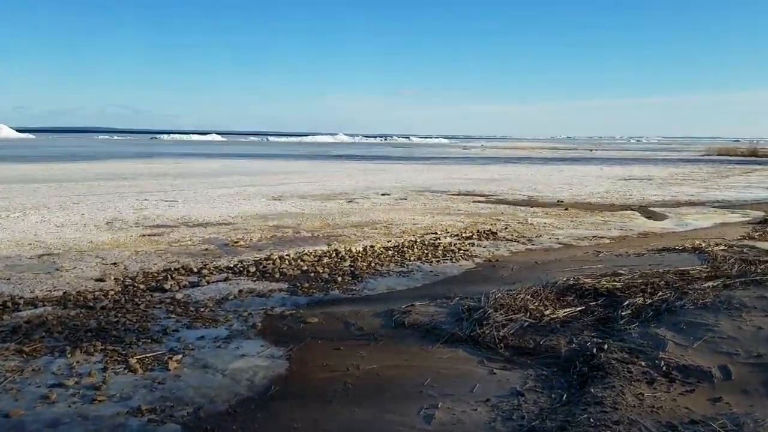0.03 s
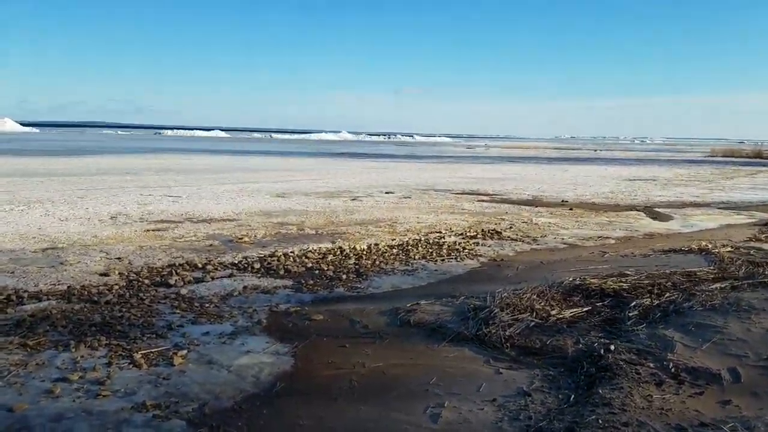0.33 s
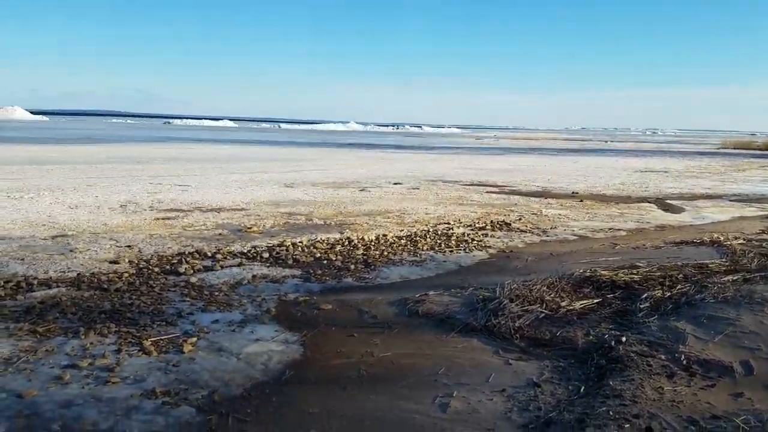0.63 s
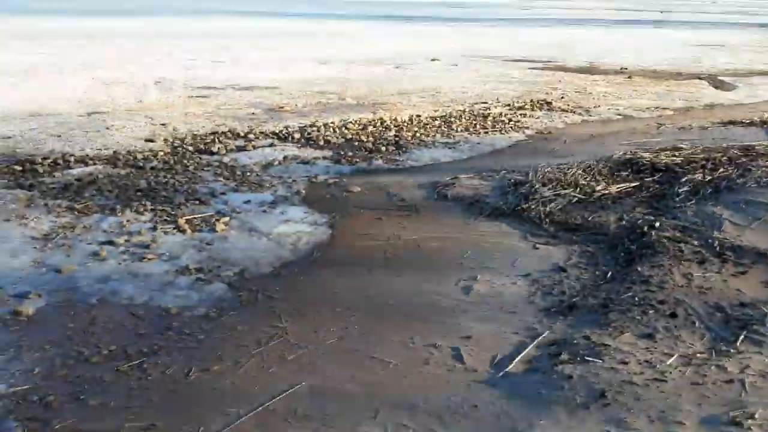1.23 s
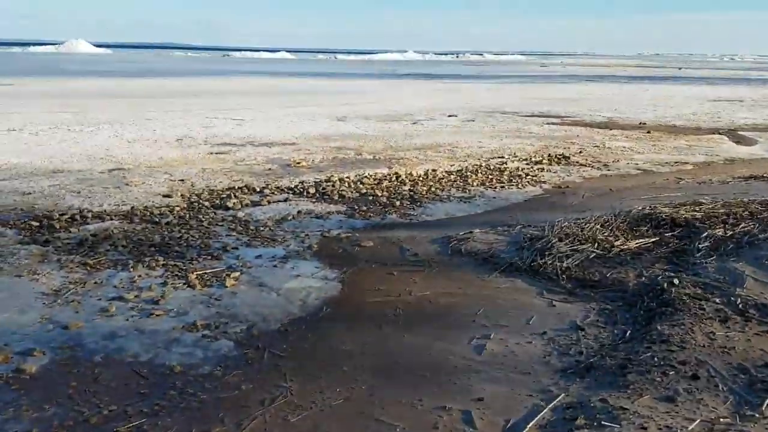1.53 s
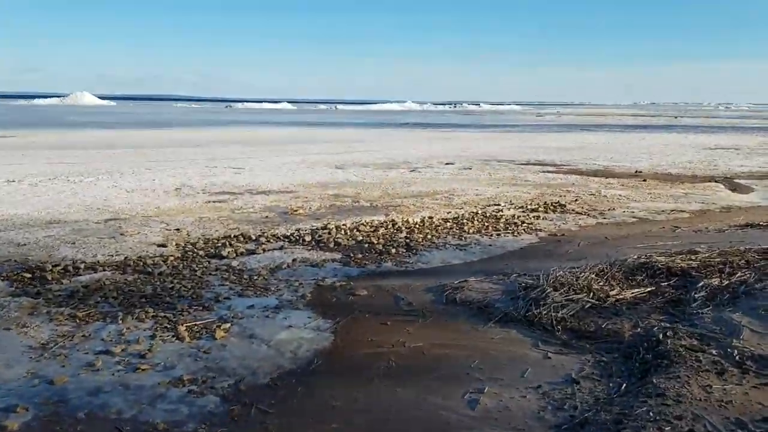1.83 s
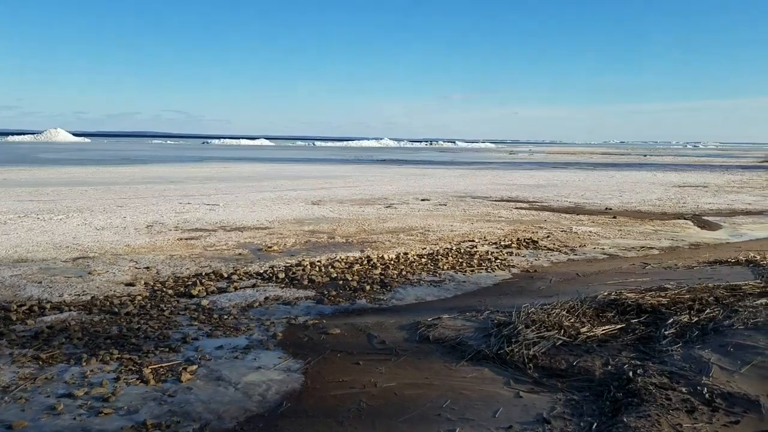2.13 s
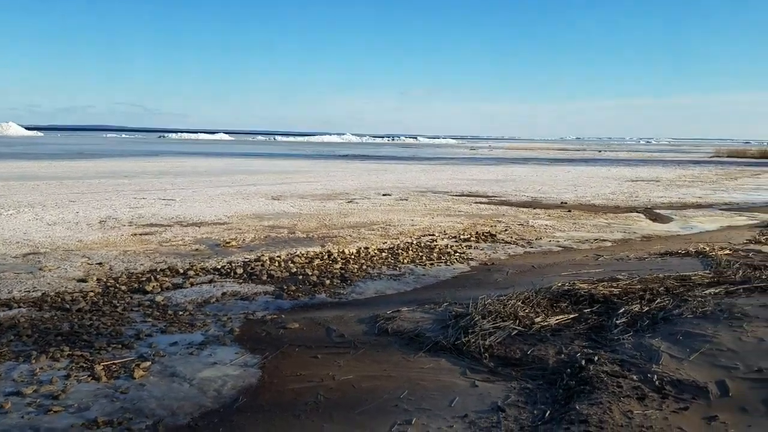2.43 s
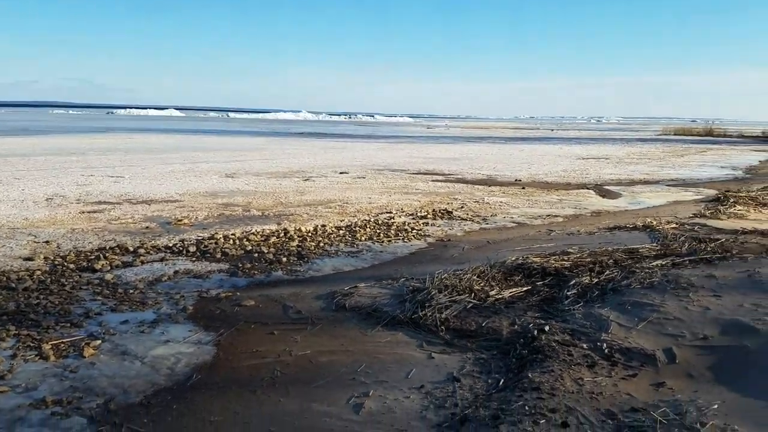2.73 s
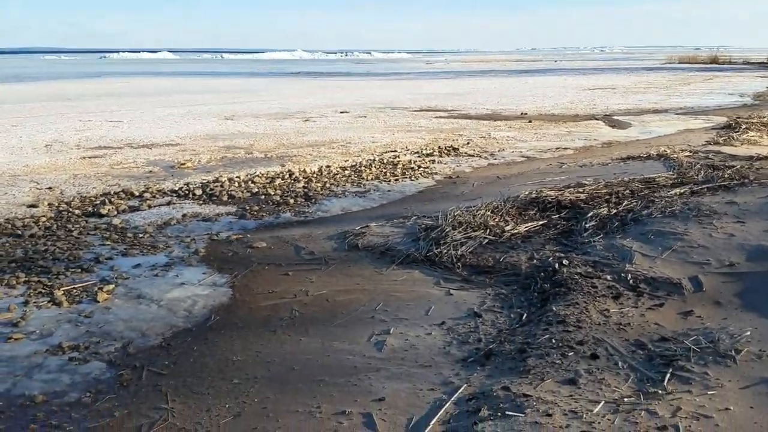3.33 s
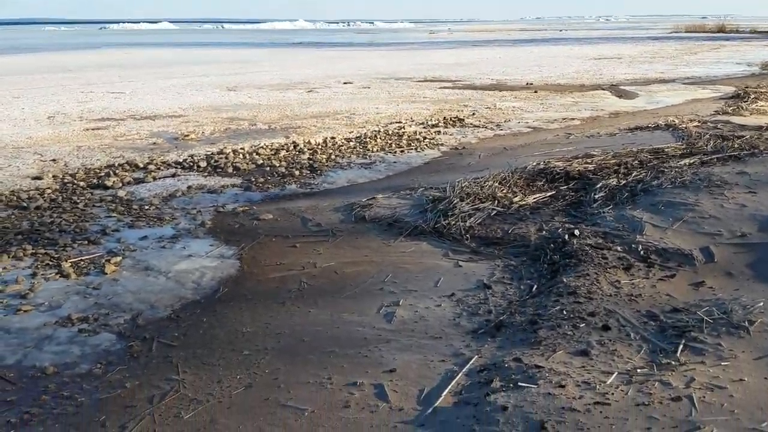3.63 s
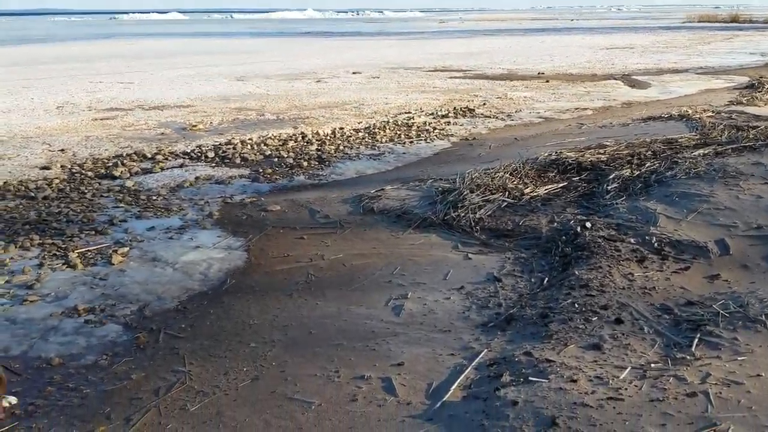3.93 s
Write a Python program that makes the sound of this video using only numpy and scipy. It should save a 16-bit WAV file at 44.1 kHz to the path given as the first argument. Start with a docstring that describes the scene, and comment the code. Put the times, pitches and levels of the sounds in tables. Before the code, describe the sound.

Wind rumbles and thumps on a hand-held microphone on a frozen shore. After a brief lull, icy crust crunches, snaps and knocks close on the left, as if underfoot, while the gusts return over a faint hiss.

```python
"""Wind on a frozen shore buffets the two microphone ports (openings) of a hand-held camera.
Its swirls rumble and thump, and the hardest gusts flutter in the right port.
Icy crust breaks close by on the left, as if underfoot, mostly after a lull in the wind:
crushed grains crunch, thin shards snap and thick plates knock.
Faint ticks of ice and a soft hiss of open air go on behind it all."""
import sys
import numpy as np
from scipy import signal
from scipy.fft import rfft, irfft, next_fast_len
from scipy.io import wavfile
from scipy.ndimage import uniform_filter1d, map_coordinates

SR = 44100
rng = np.random.default_rng(int(sys.argv[2]) if len(sys.argv) > 2 else 0)


def transcribe(u):
    """Save the signal u as a 16-bit wav file named by the first command-line argument.

    u: samples, shape (n,) or (channels, n), limited to [-1, 1]; the rate is SR.
    q: integer samples, one column per channel.
    """
    v = np.clip(np.atleast_2d(u).T, -1, 1)
    q = np.round(v * 32767).astype(np.int16)
    wavfile.write(sys.argv[1], SR, q)


N = 176400
TOP_HZ = 16000  # nothing higher gets through


# Tone of the wind's rumble: f/Hz, level/dB
RUMBLE_TONE = [(20, -38), (40, -22), (65, -2.5), (110, 1.5), (200, -1), (420, -6), (540, -13.5), (720, -19),
               (1000, -28.5), (1600, -33.5), (4000, -80)]
# Wind strength at the left and at the right port: t/s, level/dB
WIND_LEFT = [(0, -39.5), (.1, -36.5), (.26, -45), (.4, -58), (.59, -39), (.78, -48), (.81, -44.5),
             (.99, -45), (1.03, -38), (1.1, -48.5), (1.155, -48), (1.19, -49.5), (1.34, -43.5),
             (1.43, -54.5), (1.64, -50.5), (1.69, -59), (1.73, -50), (2.11, -51.5), (2.19, -58),
             (2.27, -50), (2.45, -49), (2.48, -41.5), (2.75, -49), (2.83, -41.5), (2.94, -62), (3.01, -32),
             (3.07, -49.5), (3.11, -35.5), (3.19, -37.5), (3.23, -51), (3.33, -38.5), (3.43, -55),
             (3.505, -24), (3.54, -32.5), (3.65, -38), (3.695, -32), (3.84, -51), (3.87, -39.5),
             (3.95, -40.5), (4, -72)]
WIND_RIGHT = [(0, -35.5), (.05, -33), (.14, -31), (.17, -35.5), (.245, -39), (.275, -30), (.32, -37.5),
              (.4, -42), (.44, -37.5), (.52, -38), (.545, -41), (.585, -32.5), (.67, -35), (.695, -42),
              (.75, -28.5), (.785, -32), (.81, -36.5), (.835, -41), (.86, -31.5), (.95, -37), (1.06, -46),
              (1.1, -49), (1.15, -37), (1.22, -52), (1.255, -39), (1.3, -47), (1.46, -51.5), (1.57, -44),
              (1.68, -46), (1.8, -50), (1.85, -41.5), (1.9, -46), (2.02, -43.5), (2.16, -48), (2.32, -34),
              (2.4, -38.5), (2.44, -43.5), (2.49, -37), (2.75, -41.5), (2.8, -54), (2.84, -32),
              (2.89, -44.5), (3.03, -35), (3.07, -45.5), (3.11, -35.5), (3.2, -38.5), (3.29, -59),
              (3.34, -36.5), (3.39, -65), (3.5, -30.5), (3.61, -49.5), (3.67, -38.5), (3.72, -46.5),
              (3.91, -45), (4, -68)]

def wind_rumble(swirls_per_s=70, puffs_per_s=110, depth_db=4, split_hz=216):
    """Each port meets its own swirls of air; stronger wind sounds brighter."""
    wind_db = np.array([over_time(WIND_LEFT), over_time(WIND_RIGHT)])
    swirls = amp(depth_db * np.array([wobble(swirls_per_s), wobble(swirls_per_s)]))
    flow = swirls * noise(RUMBLE_TONE)
    power = uniform_filter1d(uniform_filter1d(flow ** 2, size=2000), size=800)
    flow = flow / np.sqrt(np.abs(power) + 1e-12)  # even out slow swells, keep quick ones
    low = filtered(flow, lambda hz: 1 / (1 + (hz / split_hz) ** 4))
    high = flow - low
    puffs = unit(amp(depth_db * np.array([wobble(puffs_per_s), wobble(puffs_per_s)])))
    brightness = amp(0.29 * (wind_db - wind_db.mean()))
    return amp(wind_db) * (low + high * puffs * brightness)


# Hard gusts: start t/s, length/s, level/dB, top edge f/Hz
GUSTS = [(.005, 0.12, -47, 1760), (0.247, 0.061, -46, 1580), (0.321, 0.13, -46.5, 1300),
         (0.5, 0.032, -42.5, 1950), (0.591, 0.054, -42, 2050), (0.648, 0.034, -44.5, 1700),
         (0.719, 0.026, -45, 1370), (0.742, 0.051, -40.5, 2600), (0.794, 0.02, -49.5, 2000),
         (0.862, 0.03, -41, 2260), (0.894, 0.036, -44, 1940), (2.276, .095, -43, 1560),
         (2.372, 0.11, -44.5, 1830)]

def wind_flutter(low_hz=860, fade_s=0.0116, pitch_sag=0.3):
    """Hard gusts break into a rasp at the right port; its pitch rises and falls with each gust."""
    t, right = clock(), np.zeros(N)
    rough = unit(rng.standard_normal(N) * amp(4 * wobble(260)))
    for start, length, db, top_hz in GUSTS:
        def band(hz):
            low_cut = hz ** 2 / (hz ** 2 + low_hz ** 2)
            return low_cut / np.sqrt(1 + (hz / top_hz) ** 11.1)
        fade = np.clip(np.minimum(t - start, start + length - t) / fade_s + .5, 0, 1)
        live = np.flatnonzero(fade)
        rasp = unit(filtered(rough[live], band))
        speed = 1 - pitch_sag * np.linspace(-1, 1, len(live)) ** 2  # slower, so lower, at both ends
        bent = map_coordinates(rasp, [np.cumsum(speed)], mode="mirror")
        add(right, amp(db) * fade[live] * bent, live[0])
    return np.array([np.zeros(N), right])


# Single swirls hitting the ports: t/s, level/dB, f/Hz, left minus right/dB
THUMPS = [(.043, -17.5, 250, -13), (.588, -23, 325, -13), (.857, -29, 207, -1), (1.147, -28, 228, -8),
          (1.254, -30.5, 161, -5), (1.674, -37.5, 640, -18), (2.999, -30.5, 264, -6), (3.085, -25, 356, 9),
          (3.137, -23.5, 275, 4), (3.331, -28, 151, -1), (3.472, -23, 650, 2), (3.483, -20, 520, 5),
          (3.505, -16, 237, 26), (3.516, -16.5, 273, 10), (3.585, -22, 296, 24), (3.691, -25, 227, 0)]

def wind_thumps(width_cycles=0.61):
    """One swirl of air pushes on a port for a cycle or two."""
    out = np.zeros((2, N))
    for when, db, hz, pan_db in THUMPS:
        cycles = (clock() - when) * hz
        push = np.exp(-(cycles / width_cycles) ** 2) * np.sin(2 * np.pi * (cycles + rng.random()))
        side_db = np.minimum([[pan_db], [-pan_db]], 0)  # turn down the weaker side
        out += amp(db + side_db) * push
    return out


# Crust being crushed: peak t/s, rise/s, fall/s, level before trim/dB, body/dB, treble/dB
CRUNCHES = [(0.214, .05, 0.056, -43.5, 8.5, -11.5), (.465, 0.043, 0.063, -45.5, 7, -14),
            (.61, 0.16, .13, -56, -14, 5), (1.0, 0.091, 0.056, -51.5, 7, -8),
            (1.078, .01, .14, -54.5, -2, 5), (1.105, 0.022, 0.049, -41, -0.5, -12.5),
            (2.38, .03, 0.057, -47.5, -10, -14), (2.5, 0.025, 0.078, -47, -13, -4),
            (2.55, 0.059, 0.055, -44, -16, -8), (2.686, 0.054, 0.14, -40.5, 2.5, -3),
            (2.905, 0.063, 0.031, -42.5, -2, 5), (2.999, 0.089, 0.12, -49, 11, 3.5),
            (3.12, 0.15, .14, -57.5, -21, 4), (3.285, 0.1, 0.035, -44, -33, 0),
            (3.42, 0.036, .04, -47.5, -6, -2.5), (3.468, 0.013, 0.032, -29, -1.5, -12),
            (3.488, 0.038, .03, -29, 9, -8.5), (3.53, 0.056, 0.042, -42.5, -18, 9.5),
            (3.651, 0.04, 0.11, -44, 2, 1.5), (3.755, 0.053, 0.037, -47, -14, -3),
            (3.795, 0.032, 0.1, -46.5, -26, -1), (3.865, 0.034, .06, -43.5, -24, -4),
            (3.908, 0.025, 0.027, -37, -7, -5), (3.97, 0.029, 0.038, -41, 4.5, 7.5)]

def ice_crunches(grains_per_s=2200, spread_db=5.5, powder=0.72, trim_db=-2.5):
    """Crust crumbles into uneven grains and powder, swelling and then fading by 20 dB per rise or fall."""
    t, out = clock(), np.zeros(N)
    sizes = amp(spread_db * np.minimum(rng.exponential(size=N), 4)) * rng.choice([-1, 1], N)
    clicks = unit(sizes * (rng.random(N) < grains_per_s / SR))
    grains = unit(clicks + powder * rng.standard_normal(N))
    for peak, rise, fall, db, body_db, treble_db in CRUNCHES:
        from_peak = np.maximum((peak - t) / rise, (t - peak) / fall)
        live = np.flatnonzero(from_peak < 2)
        burst = grains[live] * amp(db + trim_db - 20 * from_peak[live])
        add(out, crust_tone(burst, body_db, treble_db, ring_hz=2830, ring_db=-2.5), live[0])
    return out


# Thin shards breaking: t/s, length/s, level before trim/dB, body/dB, treble/dB
SNAPS = [(0.182, .003, -42, 10, -2), (0.509, 0.0016, -45.5, 2, 8), (0.685, 0.0024, -51, -13, 14),
         (1.071, 0.0069, -50, -13, 36), (1.145, 0.0025, -53, -6, 0), (1.234, .002, -49, 0, 11),
         (1.844, .002, -55, 2, 14), (2.0, 0.0023, -44.5, -2, -7), (2.37, .002, -41.5, -1, 4),
         (2.477, 0.0028, -33, 3, -4), (2.482, 0.0026, -33.5, -3, -14), (2.493, 0.0018, -30, -9, 9),
         (2.503, 0.0025, -32.5, -19, 4), (2.524, 0.0022, -36, -9, 11), (2.529, .003, -36, -6, 7),
         (2.568, 0.0045, -38.5, -15, 11), (2.583, 0.0053, -39.5, -1, 0), (2.616, 0.0018, -32, -29, 8.5),
         (2.622, 0.0015, -37, -10, 4), (2.679, .004, -38, 8, -20), (2.691, 0.0021, -28.5, -2, -2),
         (2.699, 0.0029, -31, -8, 24), (2.717, 0.0054, -38, 2, 3), (2.734, 0.0016, -36, -4, 22),
         (2.756, 0.0065, -42.5, 13, 9.5), (2.772, .003, -41.5, -1, -27), (2.814, 0.0033, -49.5, 14, 18),
         (2.87, 0.0017, -43, -2, 12), (2.89, .007, -43, -20, 8), (2.911, 0.018, -38.5, 1.5, 6),
         (3.019, 0.0023, -41, 16, 17), (3.11, 0.006, -44, -14, 7), (3.194, 0.0052, -34.5, -20, 6.5),
         (3.251, 0.0021, -27, -15, 3), (3.261, 0.002, -38, -23, 6), (3.277, 0.0034, -33, -19, 8),
         (3.286, 0.0059, -30, -1.5, 4), (3.301, 0.0022, -33.5, -28, 5), (3.343, 0.0044, -30.5, -22, -3.5),
         (3.534, .003, -41, -13, 12), (3.547, 0.0033, -40, -8, 11), (3.644, 0.002, -35.5, -11, 13),
         (3.737, 0.0038, -37, 7, 4), (3.747, 0.0063, -35, 8, -8), (3.759, .003, -47, -4, 12),
         (3.773, 0.0054, -30.5, 0, 0), (3.783, 0.0026, -36, -4, 5), (3.796, 0.0051, -36.5, -8, 6),
         (3.834, .008, -42, -21, -1), (3.861, 0.0023, -32, -21, 6), (3.888, 0.0017, -31.5, -23.5, 6),
         (3.902, 0.016, -34, 6, -3), (3.92, 0.0025, -29.5, -29, -2)]

def ice_snaps(trim_db=-2):
    """Thin shards snap brightly."""
    out = np.zeros(N)
    for when, length, db, body_db, treble_db in SNAPS:
        burst = shard(length, body_db, treble_db)
        add(out, amp(db + trim_db) * burst, round(when * SR) - len(burst) // 2)
    return out


# Thick plates breaking: t/s, length/s, level before trim/dB, ring f/Hz, body/dB, treble/dB
CRACKS = [(.455, 0.0055, -33.5, 2030, 8.5, -3.5), (0.467, 0.0056, -36, 2060, 7, 1),
          (2.544, 0.0056, -25, 1770, -3, -8), (2.549, 0.0065, -32, 2800, -5, -5),
          (2.689, 0.022, -40, 2070, 2, -1), (3.452, 0.0052, -31.5, 3470, -5, -5),
          (3.485, .006, -30, 745, 1, -4), (3.636, 0.0041, -29, 2330, 2.5, -14),
          (3.669, 0.0041, -23, 1040, 5, -9.5), (3.851, 0.0021, -28.5, 3300, -11.5, 2)]

def ice_cracks(trim_db=-1):
    """Thick plates give way with a hollow knock, each at its own pitch."""
    out = np.zeros(N)
    for when, length, db, ring_hz, body_db, treble_db in CRACKS:
        burst = ice_break(length, body_db, treble_db, ring_hz, ring_db=9)
        add(out, amp(db + trim_db) * burst, round(when * SR) - len(burst) // 2)
    return out


def shard(length, body_db, treble_db):
    """One thin shard breaks and rings at a chance pitch."""
    ring_hz = 2830 * np.exp(0.19 * rng.standard_normal())
    return ice_break(length, body_db, treble_db, ring_hz, ring_db=4.5)


def ice_break(length, body_db, treble_db, ring_hz, ring_db, attack_s=0.00021, trickle_s=0.034):
    """A split races through the ice and leaves a faint trickle; it starts at the middle sample."""
    t = np.arange(-2048, 2048) / SR
    attack = np.clip(t / attack_s, 0, 1)
    split = np.exp(-(t / length) ** 2)
    trickle = amp(-26) * np.exp(-np.abs(t) / trickle_s)
    burst = attack * (split + trickle) * rng.standard_normal(len(t))
    return crust_tone(burst, body_db, treble_db, ring_hz, ring_db)


# Tone shared by all the breaking ice: f/Hz, level/dB
CRUST_TONE = [(100, -5), (350, 2), (800, 8), (1200, 9), (1550, 6), (1950, 6), (2300, 3.5), (2800, 3.5),
              (4000, 2.5), (5500, -2.5), (7000, 0.5), (9500, -7.5), (15500, -1)]

def crust_tone(burst, body_db, treble_db, ring_hz, ring_db, body_hz=1115, ring_octaves=0.24):
    """The crust shapes a burst: its body (the lows), its treble (the highs) and one peak or dip."""
    def response(hz):
        body = along([(body_hz, body_db), (2200, 0)], hz)
        treble = along([(2960, 0), (7060, treble_db)], hz)
        ring = ring_db / (1 + (np.log2((hz + 1) / ring_hz) / ring_octaves) ** 2)
        gain = amp(along(CRUST_TONE, hz) + body + treble + ring) * (hz < TOP_HZ)
        return gain / np.sqrt(np.mean((gain * (hz > body_hz)) ** 2))  # same power above the body
    return filtered(burst, response)


# Shading of the ice sounds at the right port: f/Hz, level/dB
RIGHT_SHADE = [(500, -4), (2000, -2), (4500, -4.5), (7000, -9), (9000, -0.5), (12000, -1), (16000, -11)]
# Tone of what bounces off the ground and the person holding the camera: f/Hz, level/dB
BOUNCE_TONE = [(300, 10), (1200, -4), (3000, -5), (7000, 2), (15500, 7)]

def from_left(ice, lag_s=0.0003535, bounce_s=0.00083):
    """Sound reaches the right port later and shaded; its tiny echoes change from spot to spot."""
    right = filtered(ice, lambda hz: amp(along(RIGHT_SHADE, hz)) * np.exp(-2j * np.pi * hz * lag_s))
    direct, bounced = np.array([ice, right]), np.zeros((2, N))
    t = np.arange(1024) / SR
    for spot in np.array_split(np.arange(N), 700):
        for port in range(2):
            tail = rng.standard_normal(len(t)) * np.exp(-t / bounce_s)
            echoes = signal.fftconvolve(direct[port, spot], tail / np.linalg.norm(tail))
            add(bounced[port], echoes, spot[0])
    return direct + filtered(bounced, lambda hz: amp(along(BOUNCE_TONE, hz)))


def ice_ticks(per_s=22, level_db=-63, spread_db=7):
    """The ice ticks faintly at chance moments."""
    out = np.zeros(N)
    for start in rng.integers(0, N, int(per_s * N / SR)):
        tick = shard(length=0.00085, body_db=-4, treble_db=20)
        add(out, amp(level_db + spread_db * rng.standard_normal()) * tick, start)
    return out


# Tone of the open air: f/Hz, level/dB
AIR_TONE = [(100, 7), (600, 0.5), (1300, 1), (2500, -4), (5000, -12.5), (7000, -13.5), (10000, -12.5),
            (15500, -7)]
# Loudness of the open air: t/s, level/dB
AIR_LEVEL = [(0, -54.5), (.7, -55), (1.15, -53), (1.5, -58), (2.15, -58), (2.5, -53.5), (4, -52)]

def open_air():
    """A faint hiss slowly swells and sinks."""
    return amp(over_time(AIR_LEVEL)) * noise(AIR_TONE)


def amp(db):
    """Turn decibels into a multiplier."""
    return 10 ** (np.asarray(db) / 20)


def unit(x):
    """Scale to an average power of 1."""
    return x / np.sqrt(np.mean(x ** 2) + 1e-20)


def along(points, hz):
    """Read between (f/Hz, value) points, spaced by pitch."""
    freqs, values = np.transpose(points)
    return np.interp(np.log(hz + 1), np.log(freqs + 1), values)


def clock():
    """Time of every sample, in seconds."""
    return np.arange(N) / SR


def over_time(points):
    """Join (t/s, value) points with straight lines."""
    return np.interp(clock(), *np.transpose(points))


def wobble(per_s):
    """A smooth curve through per_s random values a second."""
    return map_coordinates(rng.standard_normal(4096), [clock() * per_s], mode="wrap")


def filtered(x, response):
    """Multiply each frequency in x by response(hz)."""
    n = x.shape[-1]
    padded = next_fast_len(n + 2048)
    hz = np.fft.rfftfreq(padded, 1 / SR)
    return irfft(rfft(x, padded) * response(hz), padded)[..., :n]


def noise(tone):
    """Noise with the given tone, separate for each port."""
    return unit(filtered(rng.standard_normal((2, N)), lambda hz: amp(along(tone, hz))))


def add(track, x, start):
    """Mix x into the track from sample start on."""
    a, b = max(start, 0), min(start + len(x), N)
    track[a:b] += x[a - start:b - start]


def scene():
    """Wind on the ports, ice breaking on the left and open air behind."""
    air = open_air()
    wind = wind_rumble() + wind_flutter() + wind_thumps()
    ice = ice_crunches() + ice_snaps() + ice_cracks() + ice_ticks()
    return wind + from_left(ice) + air


# How well the microphone hears each pitch: f/Hz, level/dB
MIC_TONE = [(20, 0), (6500, -2), (7400, -1.5), (8100, -11), (9200, -3.5), (16000, -7.5)]

def record(dry):
    """The microphone has a dip in the treble and cuts off the very top."""
    return filtered(dry, lambda hz: amp(along(MIC_TONE, hz)) * (hz < TOP_HZ))


dry = scene()
out = record(dry)
transcribe(out)
```